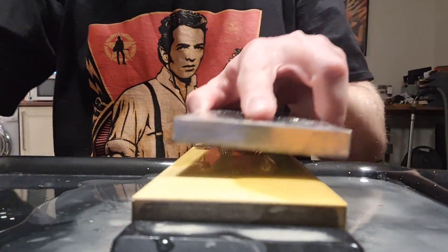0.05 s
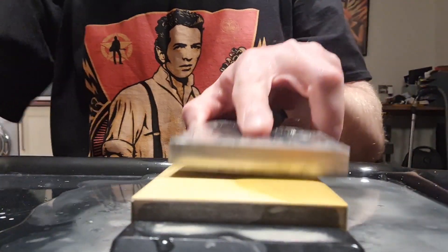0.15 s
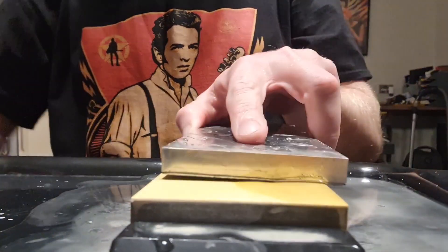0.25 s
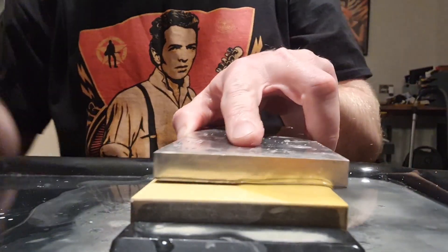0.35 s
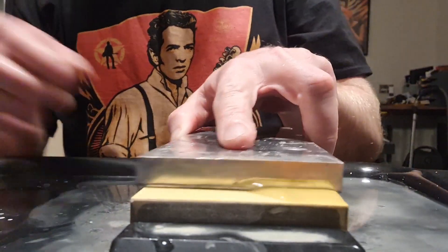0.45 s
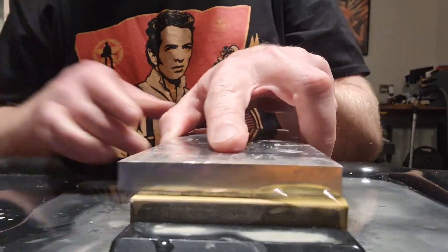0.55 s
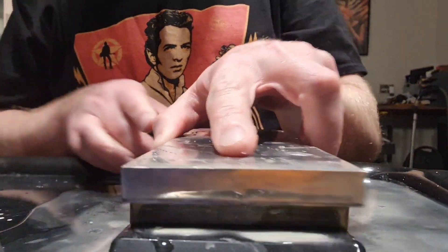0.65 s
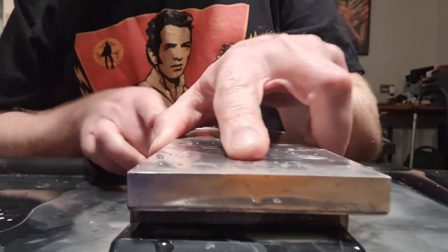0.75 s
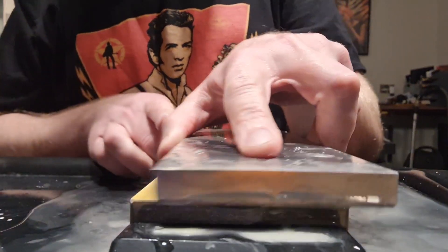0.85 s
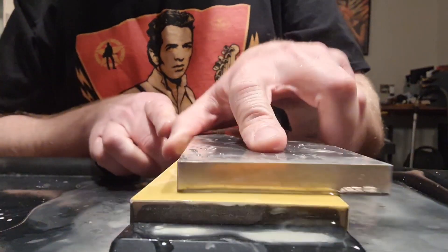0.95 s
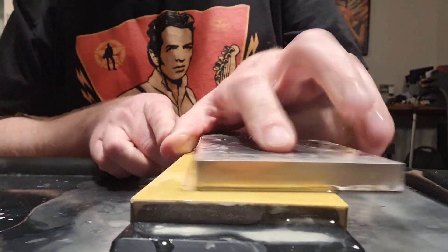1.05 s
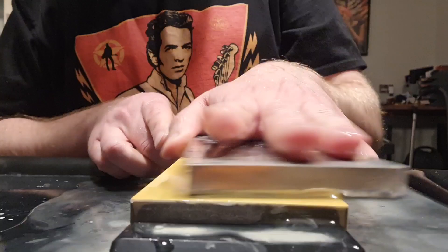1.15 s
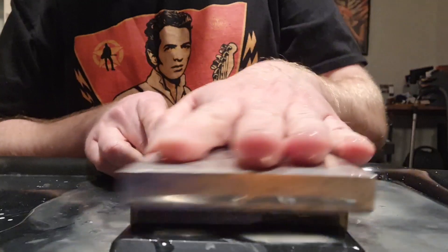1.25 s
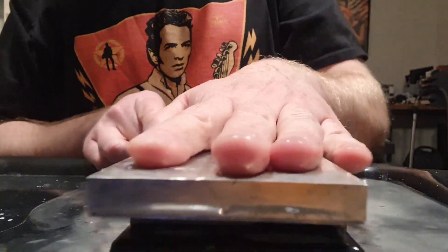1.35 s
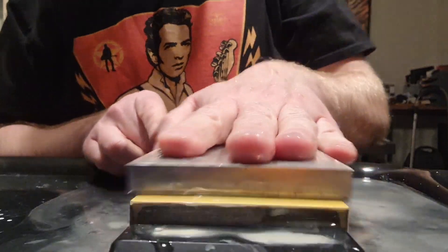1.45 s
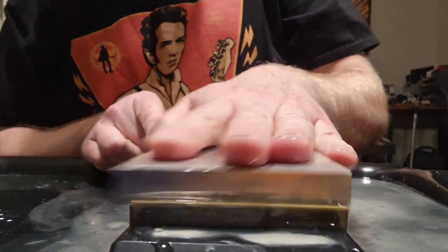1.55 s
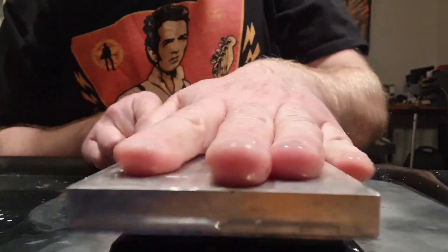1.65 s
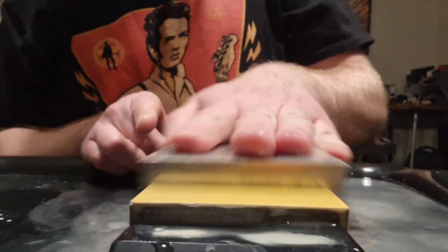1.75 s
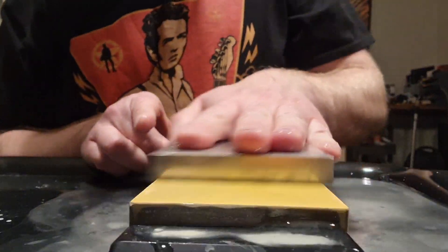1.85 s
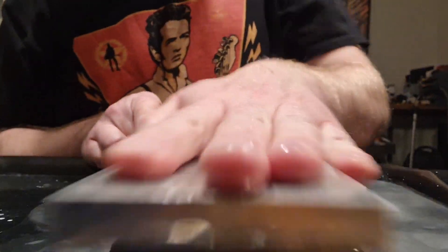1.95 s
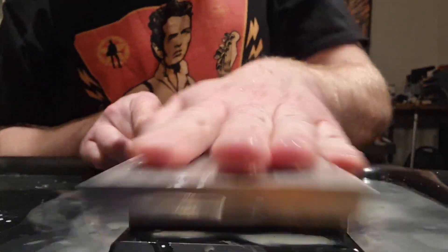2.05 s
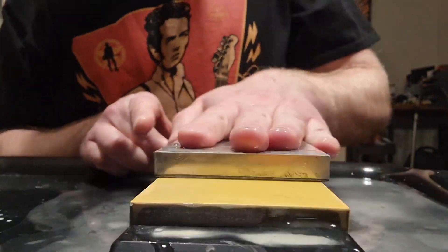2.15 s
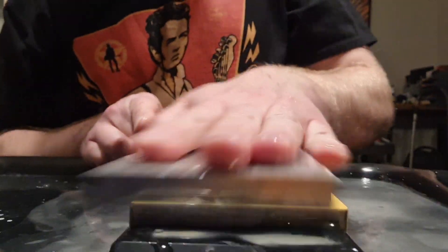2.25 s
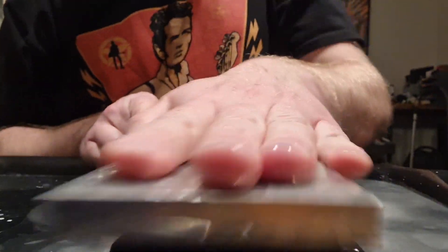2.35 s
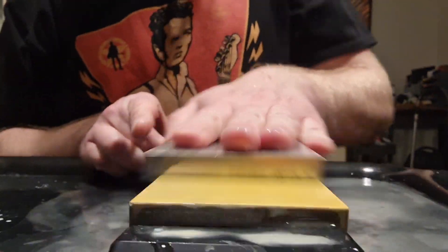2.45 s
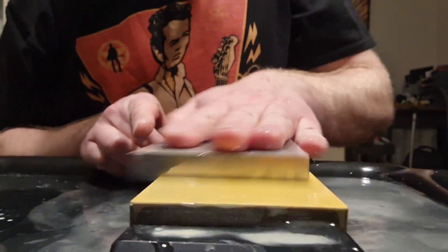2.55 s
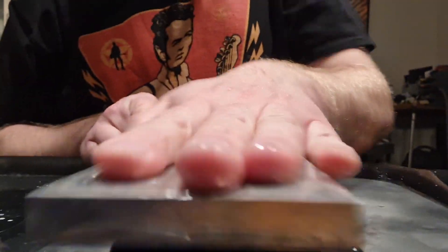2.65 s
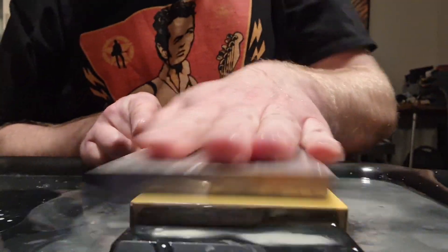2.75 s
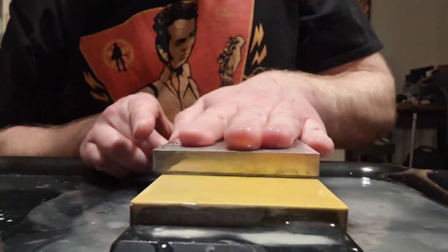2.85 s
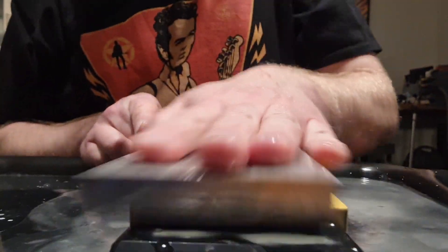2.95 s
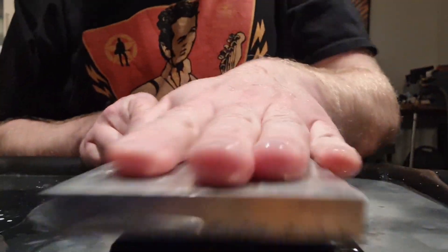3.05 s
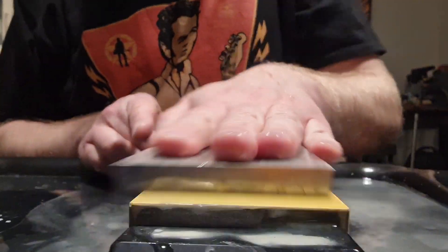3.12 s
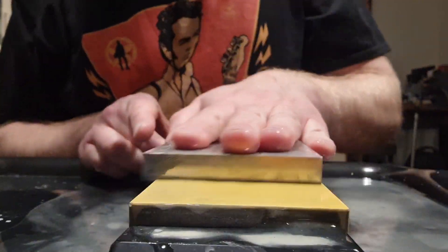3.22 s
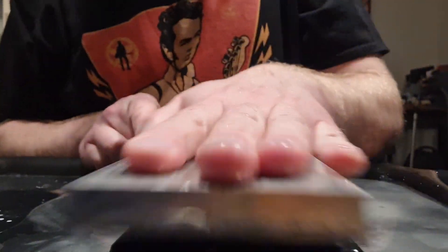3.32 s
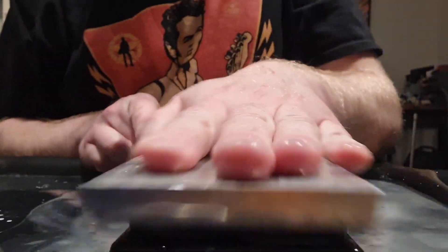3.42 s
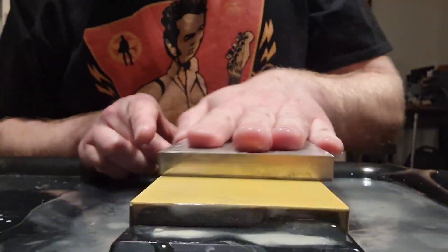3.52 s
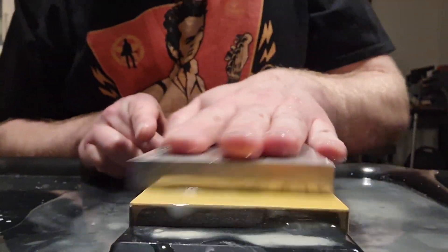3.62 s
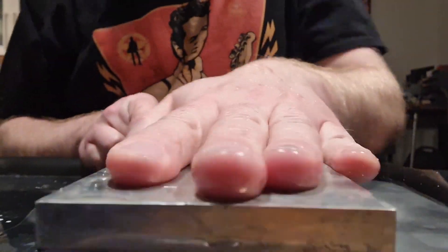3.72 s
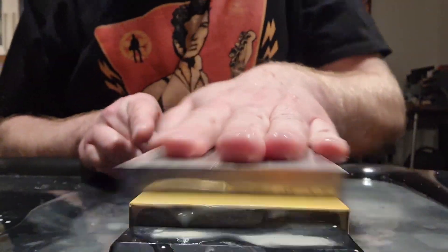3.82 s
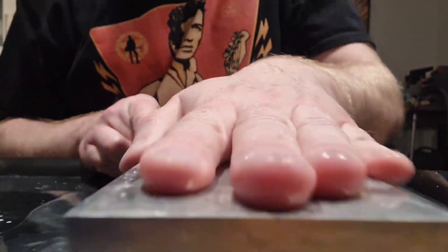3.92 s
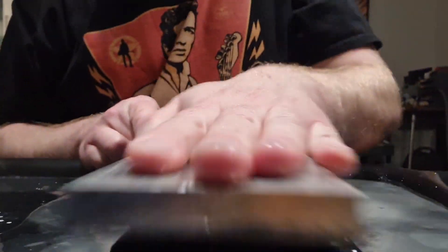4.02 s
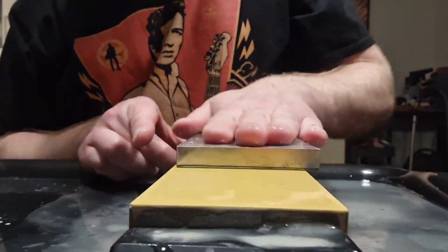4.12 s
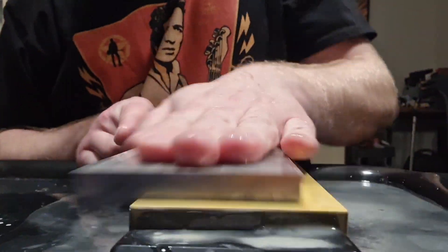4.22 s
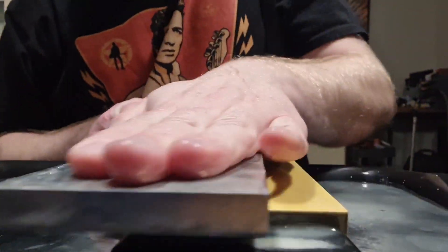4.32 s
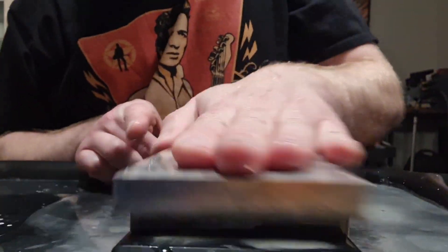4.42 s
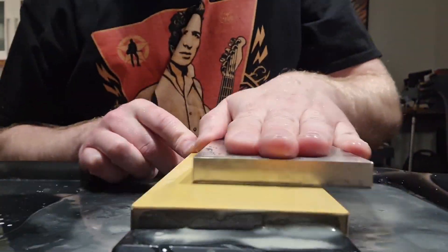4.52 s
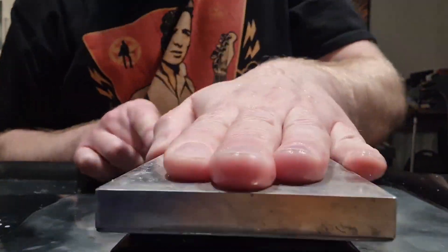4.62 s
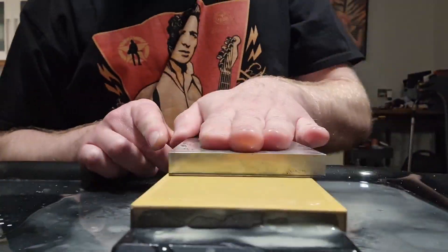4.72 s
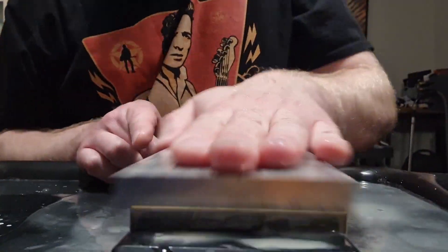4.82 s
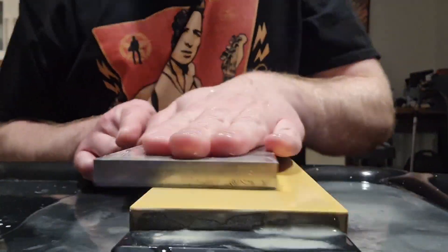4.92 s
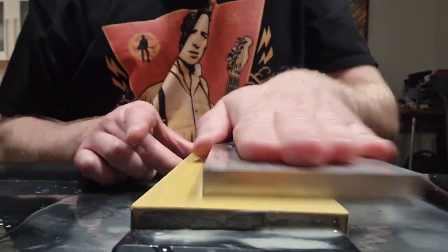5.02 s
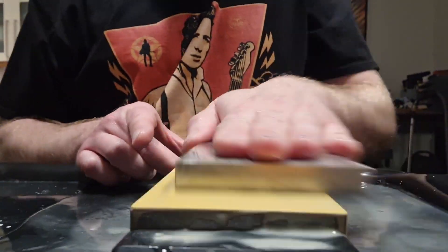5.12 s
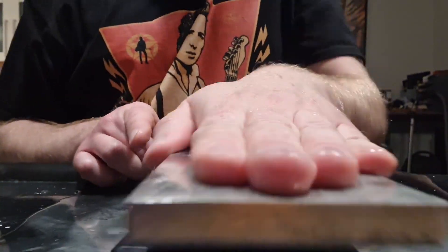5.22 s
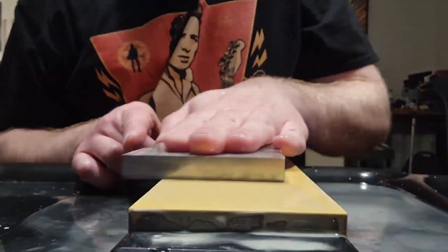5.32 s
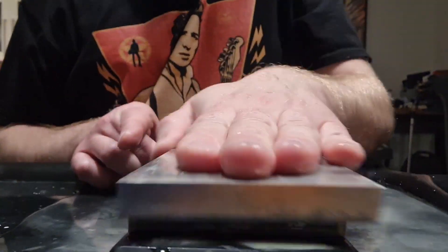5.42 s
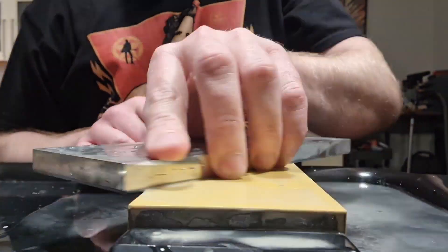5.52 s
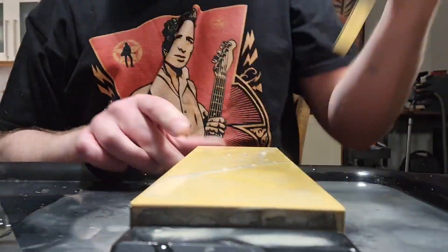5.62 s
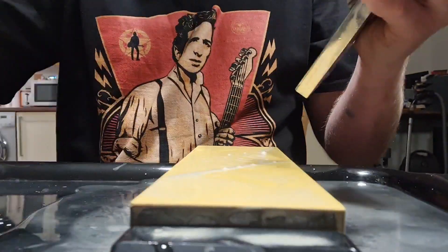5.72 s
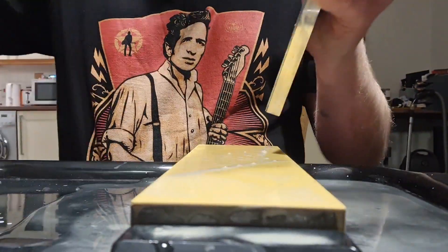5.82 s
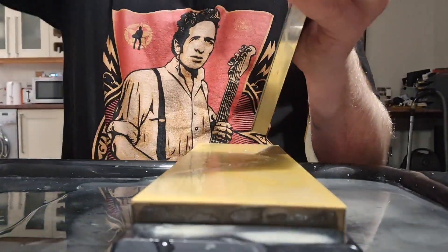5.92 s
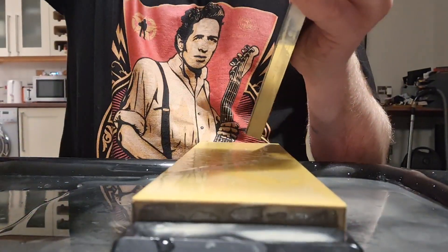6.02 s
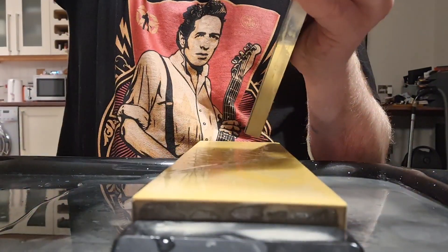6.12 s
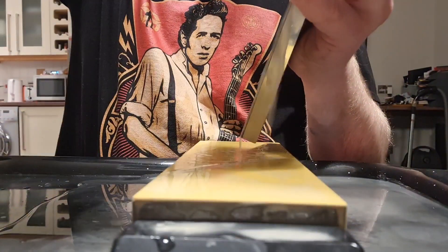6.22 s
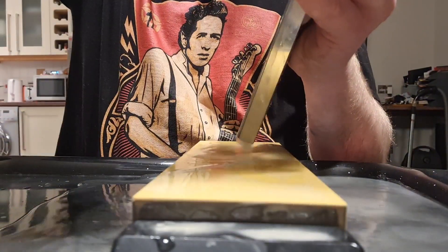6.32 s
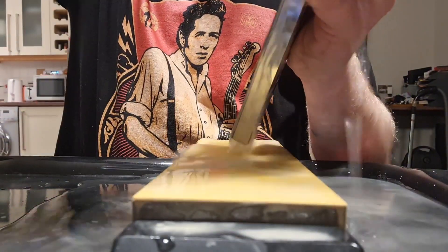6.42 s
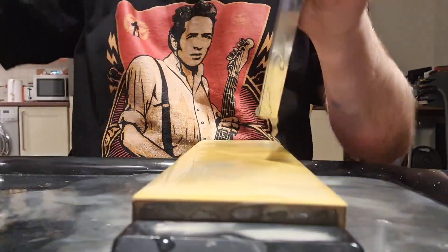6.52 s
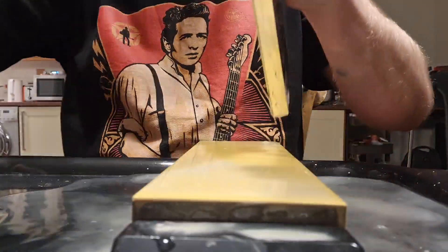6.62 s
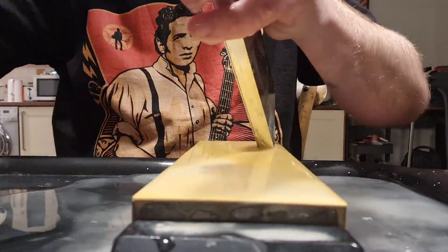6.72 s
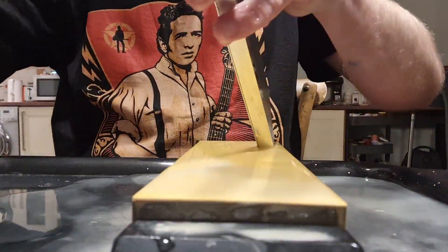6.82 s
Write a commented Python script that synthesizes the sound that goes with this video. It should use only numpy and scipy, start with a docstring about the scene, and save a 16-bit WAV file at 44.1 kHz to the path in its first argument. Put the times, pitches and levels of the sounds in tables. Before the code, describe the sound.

A close, quiet kitchen with soft air noise and a faint low drone. A hollow boom dies away at once; at 0.2 s a metal plate knocks sharply on a wet stone, with a little water pop. It slides lightly, hissing and faintly singing high, fading by 0.7 s, with a barely audible touch at 0.5. From 1.1 s rubbing grows into strong long strokes, about six a second: bright, sandy rasp, brief lulls at the turns, wet squelch, and a deep table throb on each stroke. At 3.9 s it catches, then becomes quick, jerky scrubs, nearly twenty a second, scratchier and uneven, with a few low throbs, until 5.5 s. A dull thump and wet pop follow at 5.6, then small handling bumps until 5.85. Near quiet; droplets tick and spit crisply around 6.3-6.5, then two soft hollow tray bumps at 6.7 and 6.85.

```python
"""A hollow boom dies away in a quiet kitchen, then a diamond plate knocks down on a wet whetstone in a plastic tray.
It slides lightly on one corner and sings, then is rubbed in long strokes, about six a second, then in quick short ones.
Grit rasps as random grains through coloured spectra, slurry squelches, and each long stroke swings the table's lowest mode.
Contacts strike decaying modes of table, tray and stone; bubbles are rising, dying sines.
The plate is lifted, water ticks and spits, and the tray takes two soft bumps."""
import sys
import numpy as np
from scipy import signal
from scipy.fft import rfft, irfft, next_fast_len
from scipy.io import wavfile
from scipy.ndimage import uniform_filter1d

SR = 44100
rng = np.random.default_rng(int(sys.argv[2]) if len(sys.argv) > 2 else 0)


def generate_wav(sig):
    """Save sig (samples, or channels by samples) to the path in sys.argv[1] as 16-bit PCM at SR."""
    pcm = np.round(np.clip(np.atleast_2d(sig).T, -1, 1) * 32767).astype(np.int16)
    wavfile.write(sys.argv[1], SR, pcm)


N = 302967
TIME = np.arange(N) / SR

# Long strokes, from the far end of the stone and from the near end in turn, each lasting until the next.
# Each row: start in seconds, rasp level in dB, fizz in dB over the rasp, squelch level in dB, table sway in dB.
LONG_STROKES = [(1.09, -45.5, -10, -48, -42), (1.345, -38.5, -4.5, -46, -48),
                (1.512, -36, -3, -44.5, -29.5), (1.664, -33.5, -0.5, -46.5, -24.5),
                (1.83, -32.5, 1.5, -40, -17.5), (2.009, -31, 0, -43.5, -20),
                (2.177, -30.5, 0.5, -42.0, -14), (2.346, -30.5, 1, -44, -15),
                (2.516, -30.5, -1.5, -43.5, -15.5), (2.691, -30, -1.5, -44.5, -18.5),
                (2.858, -30, -1, -43, -14.5), (3.041, -31, -1, -46.5, -19), (3.214, -30.5, -2, -45, -20),
                (3.391, -31.0, -1.0, -43.5, -19.5), (3.569, -29.5, -1.5, -46, -21.5),
                (3.749, -30, -1.5, -44, -27)]
# Short jerky strokes, each lasting until the next.
# Each row: start in seconds, rasp level in dB, bite of the edge in dB over the rasp, scrub level in dB.
SHORT_STROKES = [(3.897, -29.5, 1, -44), (3.938, -30.0, -4, -42), (3.999, -31, -2.5, -44.5),
                 (4.055, -31, -2, -50), (4.095, -30.0, -1.5, -40.5), (4.141, -38.5, 4, -40),
                 (4.164, -28.5, 0.5, -44), (4.219, -30, 2, -44.5), (4.28, -28, -1.0, -39.5),
                 (4.323, -31, 2.5, -45), (4.392, -32, -5.5, -46.0), (4.442, -33.5, 0, -42.5),
                 (4.487, -35, -1, -45.5), (4.561, -37, -2.5, -42), (4.613, -35.5, -2.0, -44),
                 (4.675, -35.5, 2, -37), (4.719, -32.5, -3, -45), (4.796, -31.5, -3.5, -46.5),
                 (4.858, -32.5, -5, -52), (4.885, -31.5, -3.5, -45.5), (4.93, -29, 5, -48.5),
                 (4.964, -30.5, -5, -46.0), (4.995, -34.5, -0.5, -47.5), (5.077, -33.5, -3.5, -45),
                 (5.127, -32.5, -2.5, -48.5), (5.184, -37, -3.0, -43), (5.205, -33.5, -4.5, -48.0),
                 (5.284, -28, -3, -47), (5.329, -32, -2.5, -50.5), (5.443, -41, -2, -48.5)]
SHORT_START_S = SHORT_STROKES[0][0]
RUB_END_S = 5.475
PRESS_START_S, PRESS_END_S = 1.09, 1.183   # the plate settles from its corner onto its face


def from_db(db):
    """Decibels to amplitude gain: 20 dB is a factor of ten."""
    return 10 ** (np.asarray(db) / 20)


def rms_one(x):
    """Scale to unit power, so that a later gain sets the rms level."""
    return x / np.sqrt(np.mean(x ** 2) + 1e-20)


def bandpass(x, low_hz, high_hz, order=2):
    """A Butterworth band-pass: flat between its corners, falling smoothly outside."""
    return signal.sosfilt(signal.butter(order, [low_hz, high_hz], "band", fs=SR, output="sos"), x)


def coloured(x, spectrum):
    """Spectral shaping: weight each frequency by a curve that falls away beyond its ends; rms 1."""
    hz, db = np.transpose(spectrum)
    size = next_fast_len(N)
    f = np.maximum(np.arange(size // 2 + 1) * SR / size, 1)
    skirt = np.minimum(1, np.minimum(f / hz[0], hz[-1] / f)) ** 2
    curve = from_db(np.interp(np.log(f), np.log(hz), db))
    return rms_one(irfft(rfft(x, size) * skirt * curve, size)[:N])


def noise_coloured(spectrum):
    """White noise has equal power per hertz, so the curve alone sets its spectrum; rms 1."""
    return coloured(rng.standard_normal(N), spectrum)


def drift(pole_hz):
    """Slow random modulation: noise through two equal low-pass poles; rms 1."""
    r = np.exp(-20 * np.pi * pole_hz / SR)   # runs at a tenth of the sample rate
    slow = signal.lfilter([1], [1, -2 * r, r * r], rng.standard_normal(N // 10 + 4002))[4000:]
    return np.interp(np.arange(N) / 10, np.arange(len(slow)), rms_one(slow))


def ring(x, hz, t60):
    """A damped resonator: a unit click excites a sine of initial height 1 that falls 60 dB in t60 seconds."""
    r, w = from_db(-60 / (t60 * SR)), 2 * np.pi * hz / SR
    return signal.lfilter([0, np.sin(w)], [1, -2 * r * np.cos(w), r * r], x + 1e-18)


def narrow_tones(modes):
    """Sustained resonance: one noise keeps several narrow bands ringing; rms 1."""
    noise = rng.standard_normal(N)
    bands = [from_db(db) * rms_one(bandpass(noise, hz - width / 2, hz + width / 2)) for hz, width, db in modes]
    return rms_one(sum(bands))


def contact_tone(hz, cutoff_hz):
    """Quadrature modulation: two slow noises carry a resonance whose centre glides; rms 1."""
    smooth = signal.butter(1, cutoff_hz, fs=SR, output="sos")
    wander = signal.sosfilt(smooth, signal.sosfilt(smooth, rng.standard_normal((2, N))))
    phase = 2 * np.pi * np.cumsum(hz) / SR
    return rms_one(wander[0] * np.cos(phase) + wander[1] * np.sin(phase))


def grains(per_s, spread_db):
    """Brittle fracture: tiny impulses at random moments, of uneven size."""
    happens = rng.random(N) < per_s / SR
    unevenness = np.clip(rng.standard_normal(N), -2, 2)
    return happens * rng.standard_normal(N) * from_db(spread_db * unevenness)


def gate(start_s, end_s, ramp_s):
    """A trapezoidal envelope: on between two moments, with sloping ends."""
    return np.clip(np.minimum(TIME - start_s, end_s - TIME) / ramp_s, 0, 1)


def room_air():
    """Stationary background: coloured noise for still air and narrow noise bands for a faint appliance drone."""
    # Spectrum of the still air. Each row: frequency in Hz, relative density in dB per Hz.
    air_colour = [(25, -16), (40, -5), (60, 3), (100, -3), (200, -5), (320, -4), (500, -6), (640, -15),
                  (1000, -23), (1600, -21), (2100, -27), (3300, -22), (6500, -23.5), (9000, -32),
                  (15000, -40)]
    # Each row: drone frequency in Hz, width in Hz, relative level in dB.
    drone_bands = [(176, 18, 3), (322.6, 13.8, 6.5), (376, 24, -22), (470, 11.7, 8)]
    return from_db(-57.5) * noise_coloured(air_colour) + from_db(-61) * narrow_tones(drone_bands)


def kitchen(x, t60, wet_db):
    """Reverberation: exponentially decaying, dull noise convolved with the sound as a short tail from the walls."""
    t = TIME[:SR // 2]
    tail = rng.standard_normal(len(t)) * from_db(-60 * t / t60) * (t > .004)
    tail = bandpass(tail / np.sqrt(np.sum(tail ** 2)), 150, 5000, order=1)
    return x + from_db(wet_db) * signal.fftconvolve(x, tail)[:N]


def opening_boom(start_db, fall_db_per_s):
    """Exponential decay: a level falling steadily in dB makes a hollow boom die away."""
    # Each row: frequency in Hz, relative density in dB per Hz.
    boom_colour = [(60, -28), (100, -15), (185, -8.5), (226, -4), (281, -1), (330, -15), (378, -3),
                   (470, -12), (535, -8.5), (650, -15), (890, -24.5), (1900, -37), (3300, -39.5),
                   (9000, -56)]
    return from_db(start_db - fall_db_per_s * TIME) * noise_coloured(boom_colour)


def table():
    """Forced modal response: each long stroke or lean swells the table's lowest mode, which then dies away."""
    sway_hz, build_s, decay_s = 55.1, 0.034, 0.042
    far_lag_s, near_lag_s = 0.0605, .098   # widest swing after a stroke begins at the far or near end
    # The hand leans on the table. Each row: time of the widest swing in seconds, level in dB.
    lean_rows = [(.041, -27), (.245, -31), (.53, -41), (1.19, -21), (4.25, -19), (4.473, -20.5),
                 (5.009, -22.5)]
    swings = [(row[0] + (far_lag_s, near_lag_s)[k % 2], row[-1]) for k, row in enumerate(LONG_STROKES)]
    swings = swings + list(lean_rows)
    out = np.zeros(N)
    for (s, db), phase in zip(swings, rng.random(len(swings))):
        near = np.abs(TIME - s) < .3
        t = TIME[near] - s
        swell = np.where(t < 0, np.exp(-(t / build_s) ** 2), 1 / np.cosh(1.94 * t / decay_s))
        out[near] += from_db(db) * swell * np.sin(2 * np.pi * (sway_hz * t + phase))
    return out


def shaking(sway):
    """Amplitude coupling: the tray's shudder follows the short-time rms of the table's swing."""
    # Each row: frequency in Hz, relative density in dB per Hz.
    shake_colour = [(80, -1.5), (120, 3), (165, -7), (210, -9.5)]
    swing = np.sqrt(np.abs(uniform_filter1d(sway ** 2, size=1600)))
    return from_db(-18.5) * swing * noise_coloured(shake_colour)


def bubbles(rise, rough):
    """Bubble resonance: each pop in the slurry is an uneven decaying sine, rising in pitch as it opens."""
    # Each row: start in seconds, starting pitch in Hz, level in dB, time to fall 60 dB in seconds.
    bubble_rows = [(.229, 4440, -33, 0.022), (.85, 1640, -61, 0.22), (.864, 3950, -48, .025),
                   (1.065, 1245, -51, 0.14), (1.097, 1280, -37.5, 0.033), (5.574, 1920, -34, 0.026),
                   (5.86, 1570, -50, 0.024), (6.167, 1840, -55, 0.037), (6.297, 5500, -50, 0.029),
                   (6.32, 850, -55, 0.044), (6.355, 1540, -54, .04), (6.424, 3530, -32, 0.018),
                   (6.447, 3100, -41, 0.039), (6.455, 8900, -20, 0.012), (6.493, 1116, -44.5, 0.073)]
    out, t = np.zeros(N + SR), TIME[:SR // 5]
    for s, hz, db, t60 in bubble_rows:
        pitch = hz * (1 + rise * np.minimum(t / t60, 1))
        phase = 2 * np.pi * np.cumsum(pitch) / SR
        wobble = rms_one(uniform_filter1d(rng.standard_normal(len(t)), size=60))
        envelope = 1e-3 ** (t / t60) * (1 + rough * wobble) * np.minimum(t / .0015, 1)
        out[int(s * SR):int(s * SR) + len(t)] += from_db(db) * envelope * np.sin(phase)
    return out[:N]


def spits(length_s):
    """Broadband transients: drops part with tiny bright snaps of noise as the plate is stood on its edge."""
    # Each row: time in seconds, level in dB before the band-pass.
    spit_rows = [(6.4142, -36), (6.432, -47), (6.441, -48), (6.4567, -25)]
    bursts = sum(from_db(db) * (TIME > s) * np.exp(-np.abs(TIME - s) / length_s) for s, db in spit_rows)
    return bandpass(bursts * rng.standard_normal(N) + 1e-18, 6000, 12500)


def struck(blow, modes):
    """Modal synthesis: one blow sets every mode ringing, neighbours in opposite sign."""
    return sum((-1) ** k * from_db(db) * ring(blow, hz, t60) for k, (hz, db, t60) in enumerate(modes))


def knocks(thump_hz, thump_t60, grit, crack):
    """Impact excitation: a click and a short gritty crunch ring the table, the tray and the stone."""
    # Knocks, bumps and wet ticks; levels are rms over the first 12 ms.
    # Each row: time in seconds, thump, tray, stone and tick levels in dB, contact length in seconds.
    contact_rows = [(0.1962, -33, -35, -27.5, -64, 0.0013), (0.524, -50, -48.5, -59, -58, 0.0031),
                    (5.56, -25.5, -50.5, -43.5, -56, 0.0088), (5.612, -34.5, -51.5, -67, -84, 0.011),
                    (5.732, -40.5, -52, -49, -47, 0.008), (5.833, -41.5, -62, -74, -81, 0.016),
                    (6.42, -62, -64, -61, -52.5, 0.026), (6.455, -54, -61, -53, -47, 0.0045),
                    (6.472, -70, -84, -63.5, -63.5, 0.065), (6.684, -37.5, -38.5, -58, -76, 0.0046),
                    (6.836, -27.5, -39.5, -61, -68, 0.0069)]
    # The hollow tray. Each row: frequency in Hz, relative level in dB, time to fall 60 dB in seconds.
    tray_modes = [(160, -1, 0.091), (221, 1, 0.039), (298, 0.5, 0.065), (360, 1, 0.025), (474, -6.5, 0.054),
                  (546, -17.5, 0.04), (680, -8, 0.028), (900, -8, 0.0089), (1280, -17, 0.037)]
    # The stone on its holder, damped by the hand and the water.
    # Each row: frequency in Hz, relative level in dB, time to fall 60 dB in seconds.
    stone_modes = [(631, 12, 0.043), (1000, 16, 0.0099), (1410, 4, 0.024), (1480, -3, 0.015),
                   (1840, 16, 0.0067), (2460, -1, .014), (2800, -13, .012), (3480, 10, 0.011),
                   (4200, -25, .01)]
    out, t = np.zeros(N + SR), TIME[:SR // 4]
    first = int(.012 * SR)
    cushion = signal.butter(4, 4200, fs=SR, output="sos")
    for s, *levels_db, length_s in contact_rows:
        crunch = rng.standard_normal(len(t)) * np.sqrt(t / length_s) * np.exp(-t / length_s)
        click = (t == 0) * np.exp(-length_s / 0.0043)   # long, soft contacts have little click
        blow = click + grit * crunch
        tray = struck(blow, tray_modes)
        clack = crack * bandpass(blow, 600, 3200)   # dry sound between the modes
        stone = signal.sosfilt(cushion, struck(blow, stone_modes) + clack)   # cushioned by the water film
        tick = bandpass(crunch, 2600, 8000)
        push = t * np.exp(-t / 0.002)   # the weight arrives more slowly than the click
        thump = ring(push, thump_hz, thump_t60) + 1.8 * ring(push, 123.0, 0.051)
        for part, db in zip((thump, tray, stone, tick), levels_db):
            part = part / np.sqrt(np.mean(part[:first] ** 2))
            out[int(s * SR):int(s * SR) + len(t)] += from_db(db) * part
    return out[:N]


def slides():
    """Envelope of the light sliding contact before and after rubbing: quick onset, gentle release."""
    # Each row: start in seconds, length in seconds, mid-slide level in dB, swell over its length in dB.
    slide_rows = [(0.196, 0.23, -51.5, 1.5), (0.425, 0.28, -58.5, -3.5), (.83, .31, -66, 5),
                  (5.502, 0.048, -51, 2.5)]
    total = 0
    for s, length, db, swell_db in slide_rows:
        onset = gate(s, s + length + 1, ramp_s=0.013)
        release = gate(s - 1, s + length + 0.022, ramp_s=0.058)
        progress = np.clip((TIME - s) / length, 0, 1)
        total = total + np.minimum(onset, release) * from_db(db + swell_db * (progress - .5))
    return total


def corner(level):
    """Load-dependent friction: one corner hisses over the stone and resonates more the harder it bears."""
    # The hiss. Each row: frequency in Hz, relative density in dB per Hz.
    corner_colour = [(1000, -8), (2400, 3.5), (4500, 4.5), (5600, 2.5), (7200, -1.5), (8600, -2),
                     (10500, -14), (13500, -20), (15500, -28)]
    # The resonances. Each row: frequency in Hz, width in Hz, relative level in dB.
    corner_modes = [(1600, 400, -2), (2380, 300, -10), (2850, 300, -8), (3550, 500, -2), (4700, 520, 0)]
    hiss = from_db(2) * coloured(grains(per_s=8000, spread_db=0.5), corner_colour)
    tones = from_db(6.5) * level / level.max() * narrow_tones(corner_modes)
    return level * (hiss + tones) * from_db(1.8 * drift(60))


def plate(level):
    """Bending modes and damping: the plate sings when lightly held, rings only faintly under the flat hand."""
    # The plate singing as it is slid into place. Each row: time in seconds, relative level in dB.
    sing_curve = [(0.22, -68), (0.458, -56), (0.486, -62), (0.604, -45.5), (0.822, -88), (0.876, -68),
                  (1.118, -64), (1.296, -46), (1.342, -88), (1.388, -46), (1.484, -43), (1.5, -53)]
    # Bending modes. Each row: frequency in Hz, width in Hz, relative level in dB.
    bending_modes = [(6666, 56, -2), (12069, 29, -22), (13356, 45, -23)]
    s, db = np.transpose(sing_curve)
    free = from_db(1.5 + np.interp(TIME, s, db)) * gate(s[0], s[-1], ramp_s=0.018)
    pressed = from_db(-13.5) * level
    return (free + pressed) * narrow_tones(bending_modes)


def slurry(squelch, scrub, rumble):
    """Viscous drag: the wet film squelches and scrubs in uneven grains while the drag shakes the tray."""
    # Squelch of the film. Each row: frequency in Hz, relative density in dB per Hz.
    squelch_colour = [(130, -2), (220, 1.5), (290, 0.5), (370, 1.5), (470, -2.5), (600, -1.5), (820, -2.5),
                      (1100, -26), (1600, -43.5)]
    # Scrub of the mud. Each row: frequency in Hz, relative density in dB per Hz.
    scrub_colour = [(600, -11), (900, 0.5), (1150, 2.5), (1400, 6), (1800, -3.5), (2400, 0), (3200, -9.5),
                    (4500, -8)]
    # Rumble of the shaken tray. Each row: frequency in Hz, relative density in dB per Hz.
    rumble_colour = [(11, -38), (18, -1), (49, -7.5), (68, 3.5), (90, -4), (125, -13.5), (156, -18.5),
                     (260, -41.5), (340, -57.5)]
    wet = squelch * coloured(grains(per_s=1100, spread_db=-2.5), squelch_colour) * from_db(0.88 * drift(10))
    mud = scrub * coloured(grains(per_s=2600, spread_db=1.5), scrub_colour) * from_db(2.0 * drift(19))
    return wet + mud + rumble * noise_coloured(rumble_colour)


def rasp(level, bite, fizz, contact_hz):
    """Abrasion and stick-slip: diamond grit tears at the stone while the contact catches and slips."""
    # Coarse grit. Each row: frequency in Hz, relative density in dB per Hz.
    rasp_colour = [(1500, -14.5), (3000, -21.5), (4600, -2.5), (5600, -3.5), (7800, 2), (9000, 0),
                   (10500, -13), (14000, -42.5)]
    # The biting edge. Each row: frequency in Hz, relative density in dB per Hz.
    bite_colour = [(1800, -24.5), (2600, -11), (3100, 1), (3800, -6), (4400, -2), (5000, -2), (6000, -2)]
    # Fine grit. Each row: frequency in Hz, relative density in dB per Hz.
    fizz_colour = [(7000, -30.5), (8800, -8), (10000, 3), (11200, 1), (12500, -2.5), (14000, -7.5),
                   (16000, -14)]
    catch = from_db(0.3 * drift(88) + 1.2 * drift(20.7))
    coarse = from_db(-0.96) * coloured(grains(per_s=26000, spread_db=3.5), rasp_colour)
    edge_grit = from_db(-6.5) * coloured(grains(per_s=9000, spread_db=2.0), bite_colour)
    edge_tone = from_db(-1.5) * contact_tone(contact_hz, cutoff_hz=685)
    edge = (edge_grit + edge_tone) * bite * from_db(3.1 * drift(41.3))
    fine_grit = coloured(grains(per_s=26000, spread_db=-4.5), fizz_colour)
    fine = fizz * fine_grit * from_db(-2.0 + 0.82 * drift(25))
    return level * catch * (coarse + edge + fine)


def easiness():
    """Increasing load: 1 as the first stroke begins, 0 once the hand's full weight is on at 1.85 s."""
    return np.interp(TIME, [PRESS_START_S, 1.85], [1, 0])


def since_start(starts):
    """Stroke timing per sample: stroke number, seconds since it began and seconds left."""
    k = np.clip(np.searchsorted(starts, TIME) - 1, 0, len(starts) - 1)
    return k, TIME - starts[k], np.append(starts[1:], RUB_END_S)[k] - TIME


def motion():
    """Reciprocating motion: the lull at each turn (dB) and the plate's place on the stone (0 far, 1 near)."""
    # a turn: depth of the lull in dB, then braking and breaking loose in seconds at full hand weight
    far_turn, near_turn, short_turn = (-17.5, 0.026, 0.023), (-17, .018, 0.017), (-9.5, 0.011, .012)
    starts = np.array([row[0] for row in list(LONG_STROKES) + list(SHORT_STROKES)])
    turns = [(far_turn, near_turn)[k % 2] for k in range(len(LONG_STROKES))]
    turns = np.array(turns + [short_turn] * (len(SHORT_STROKES) + 1))
    depth_db, brake_s, loose_s = turns.T
    k, gone, left = since_start(starts)
    slow = 1 + .9 * easiness()   # turns take longer while the hand is light

    def lull(turn, away_s, ramp_s):
        """A cosine-squared dip on one side of a turn."""
        return depth_db[turn] * np.cos(np.pi / 2 * np.clip(away_s / (slow * ramp_s[turn]), 0, 1)) ** 2

    lull_db = lull(k, gone, loose_s) + lull(k + 1, left, brake_s)
    done = np.clip(gone / (gone + left), 0, 1)
    return lull_db, np.where(k % 2, 1 - done, done)


def per_stroke(rows):
    """Piecewise-constant control: each stroke's values hold until the next, eased across the turn."""
    starts, *columns = np.transpose(rows)
    k = since_start(starts)[0]
    return [uniform_filter1d(c[k], size=600) for c in columns]


def bearing(place):
    """Contact load: place on the stone shapes each long stroke, each jerk has its own values.

    Returns rasp, bite, fizz, squelch, scrub and rumble in dB, and the contact resonance in Hz."""
    # Even steps from the far end of the stone to the near end, where the plate tips over the edge.
    # Each row: rasp, bite, fizz and squelch offsets in dB, contact resonance in Hz under the full hand.
    along_stone = [(-1, -0.5, -5.5, 4, 4270), (-5, -1, 3.5, 0, 4230), (-0.5, -5, 0.5, -1, 4100),
                   (5, -4.5, -4, -2.5, 3980), (0.5, 0.5, -9, 1, 3900)]
    steps = np.linspace(0, 1, len(along_stone))
    rasp_at, bite_at, fizz_at, squelch_at, hz_at = [np.interp(place, steps, c) for c in np.transpose(along_stone)]
    rasp_db, fizz_db, squelch_db, _ = per_stroke(LONG_STROKES)
    long_scrub_db = -43 + squelch_at
    long = (rasp_db + rasp_at, bite_at, fizz_db + fizz_at, squelch_db + squelch_at, long_scrub_db, -36.5, hz_at)

    jerk_db, bite_db, scrub_db = per_stroke(SHORT_STROKES)
    mean_jerk_db = np.mean([row[1] for row in SHORT_STROKES])
    rumble_fall_db = 2.5 * np.maximum(TIME - SHORT_START_S, 0)   # the rumble fades steadily
    rumble_db = -28.5 + 0.5 * (jerk_db - mean_jerk_db) - rumble_fall_db
    fizz_db = -2 - .4 * bite_db   # a biting edge leaves less fizz
    short_hz = 4484 - 601 * from_db(bite_db)   # the resonance sinks as the edge bites
    short = (jerk_db, bite_db, fizz_db, -46.5, scrub_db, rumble_db, short_hz)

    quick = uniform_filter1d(1. * (TIME > SHORT_START_S), size=400)
    return [(1 - quick) * a + quick * b for a, b in zip(long, short)]


def rubbing():
    """Common excitation: one motion drives grit, plate and wet film; the fizz falls furthest at the turns."""
    # The wet film sucks at the plate. Each row: time in seconds, half length in seconds, level in dB.
    suck_rows = [(1.93, 0.042, -44.5), (2.163, .04, -32), (2.5, 0.059, -41), (2.84, .06, -43.5),
                 (3.37, 0.076, -40.5), (4.859, 0.0089, -41)]
    lull_db, place = motion()
    rasp_db, bite_db, fizz_db, squelch_db, scrub_db, rumble_db, contact_hz = bearing(place)
    # the hand stops dead before the short strokes
    rest_s, rest_width_s, rest_db = 3.898, 0.01, -24
    rest = from_db(rest_db * np.exp(-((TIME - rest_s) / rest_width_s) ** 2))
    touch = gate(PRESS_START_S, RUB_END_S, ramp_s=0.034) * rest
    settling_db = np.interp(TIME, [PRESS_START_S, PRESS_END_S], [-24, 0])
    level = touch * from_db(rasp_db + lull_db + settling_db)
    easy = easiness()
    light = slides()

    bite = from_db(bite_db + 7.7 * easy)
    fizz = from_db(fizz_db + 0.178 * lull_db + .55 * settling_db)
    grit = rasp(level, bite, fizz, contact_hz + 499.6 * easy)   # a lightly held plate scrapes at a higher pitch

    sucks = sum(from_db(db) * np.exp(-((TIME - s) / half_s) ** 2) for s, half_s, db in suck_rows)
    film = touch * from_db(squelch_db + 0.042 * lull_db + 0.23 * settling_db)
    squelch = np.hypot(film, sucks) + from_db(-0.5) * light
    scrub = touch * from_db(scrub_db + 0.38 * lull_db + 0.38 * settling_db - 6.8 * easy) + from_db(-3) * light
    rumble = touch * from_db(rumble_db + .09 * lull_db + 0.47 * settling_db - 10 * easy) + from_db(5.5) * light
    return grit + corner(light) + plate(level) + slurry(squelch, scrub, rumble)


def scene():
    """Superposition: rubbing, table, contacts and opening boom share the room's tail; the air is added dry."""
    boom = opening_boom(start_db=-20.5, fall_db_per_s=97)
    sway = table()
    water = bubbles(rise=0.19, rough=0.65) + spits(length_s=0.001)
    contacts = knocks(thump_hz=63.4, thump_t60=0.095, grit=0.14, crack=120.0)
    work = boom + sway + shaking(sway) + water + contacts + rubbing()
    return (kitchen(work, t60=0.1, wet_db=-16) + room_air())[None]


def record(dry):
    """Band limiting: an elliptic low-pass cuts the top steeply above 15750 Hz."""
    return signal.sosfilt(signal.ellip(12, .1, 90, 15750, fs=SR, output="sos"), dry)


dry = scene()
out = record(dry)
generate_wav(out)
```